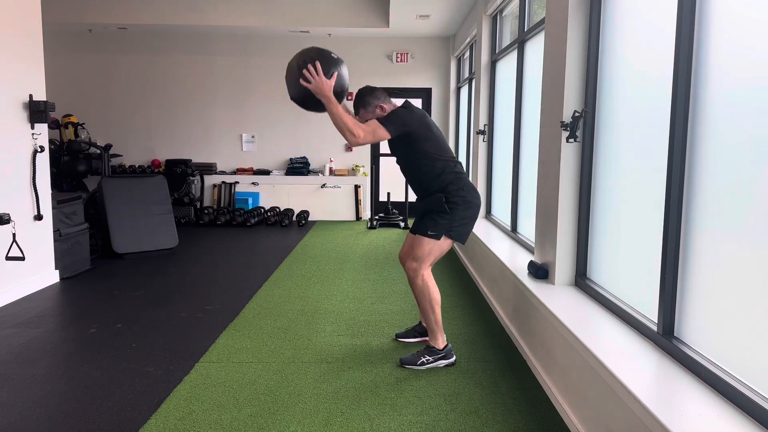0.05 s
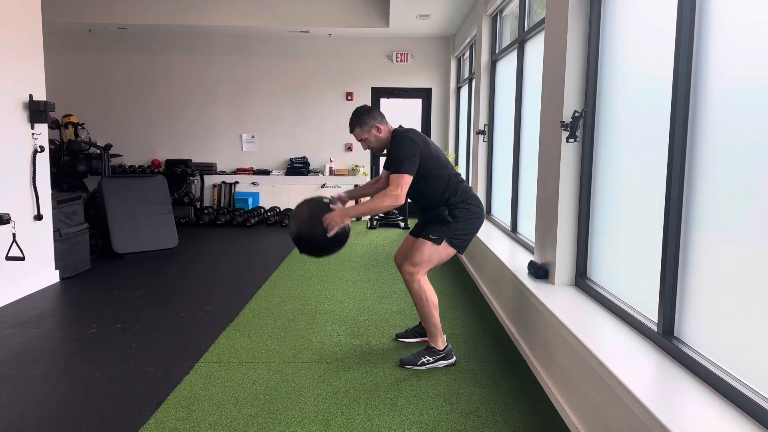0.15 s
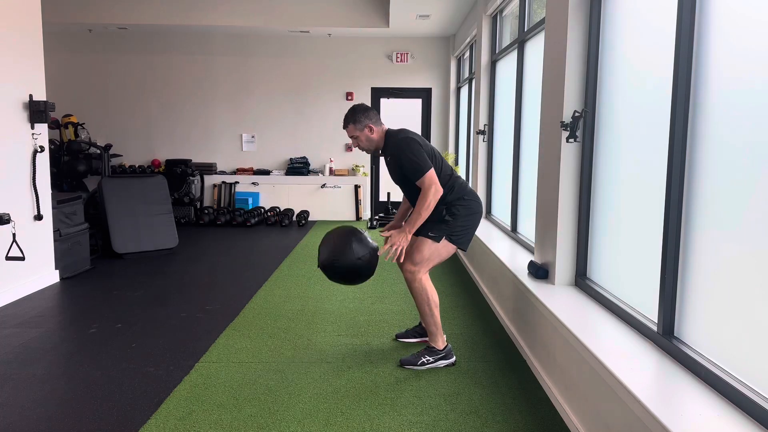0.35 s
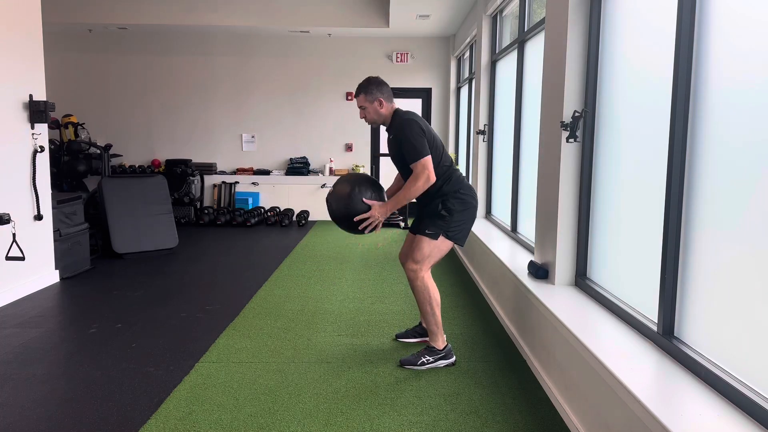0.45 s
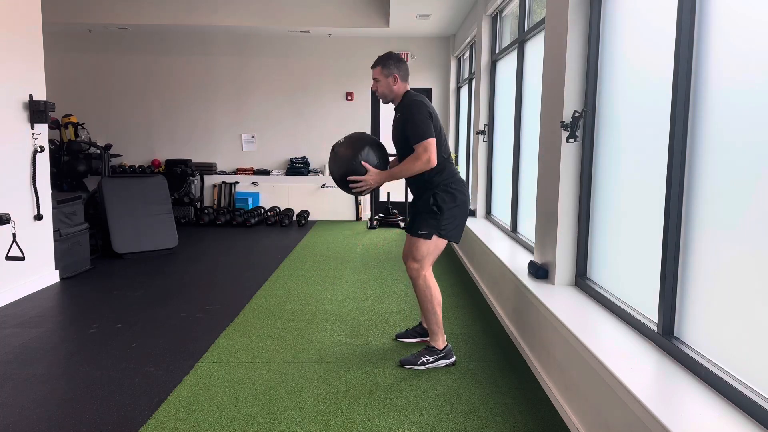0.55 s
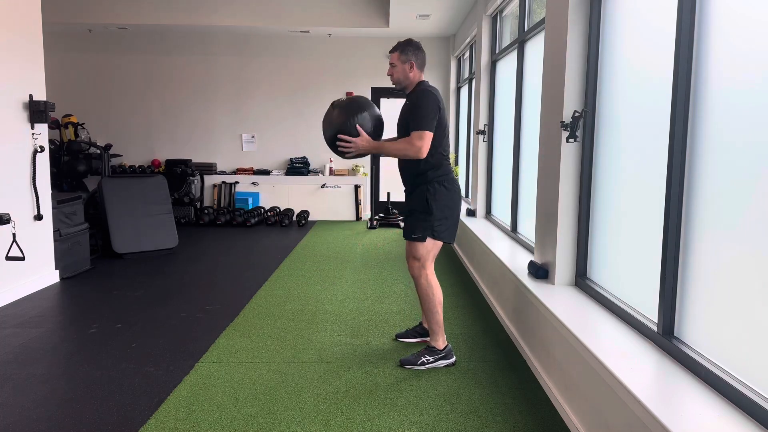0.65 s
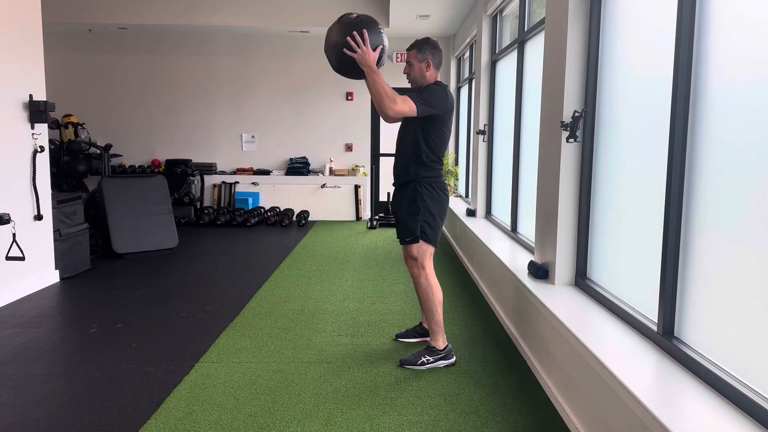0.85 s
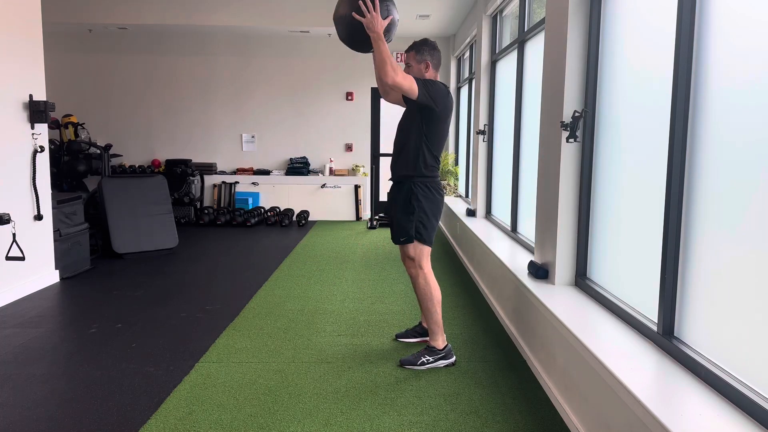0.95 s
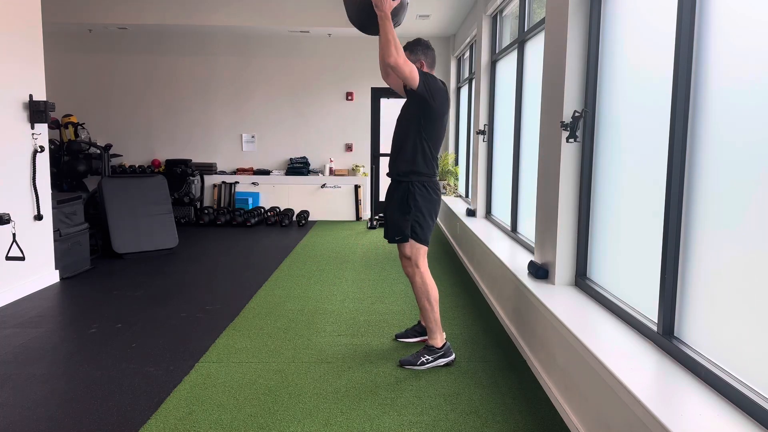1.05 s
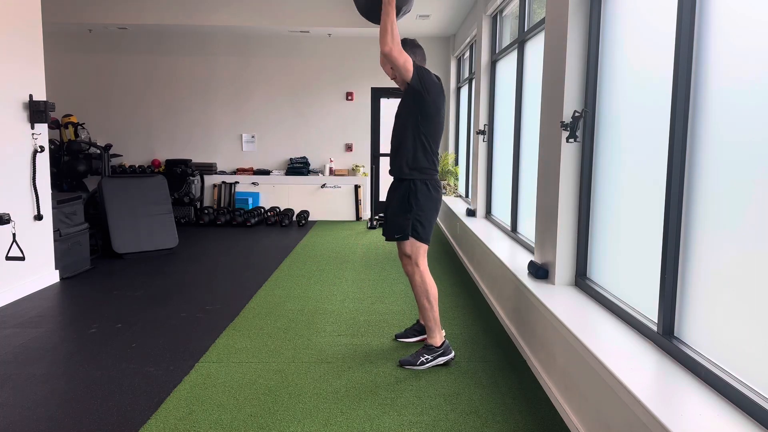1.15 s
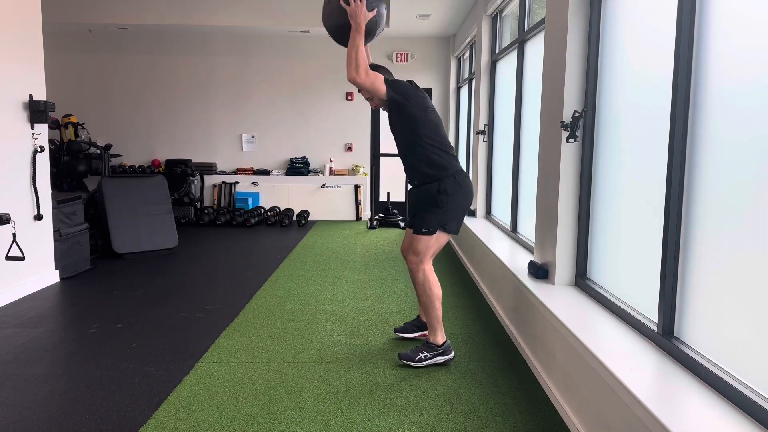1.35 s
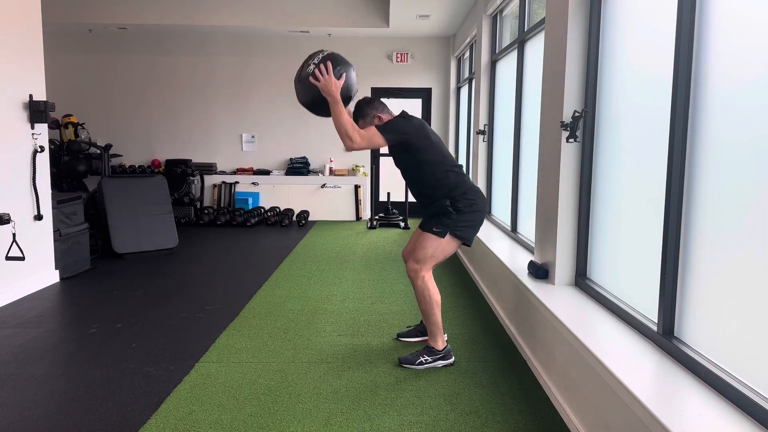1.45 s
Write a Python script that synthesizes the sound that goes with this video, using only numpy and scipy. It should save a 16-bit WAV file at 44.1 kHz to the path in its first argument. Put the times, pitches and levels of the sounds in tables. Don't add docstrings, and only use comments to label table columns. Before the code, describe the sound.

A heavy rubber ball slams onto gym turf with a deep thud and long boomy decay

```python
import sys
import numpy as np
from scipy import signal
from scipy.fft import rfft, irfft, next_fast_len
from scipy.io import wavfile
from scipy.ndimage import uniform_filter1d, map_coordinates

SR = 44100
rng = np.random.default_rng(int(sys.argv[2]) if len(sys.argv) > 2 else 0)


def materialize(psi):
    bounded = np.clip(np.atleast_2d(psi).T, -1, 1)
    quanta = np.round(bounded * 32767).astype(np.int16)
    wavfile.write(sys.argv[1], SR, quanta)


def attenuation_scalar(level_db):
    decades = np.asarray(level_db, float) / 20
    return 10 ** decades


N = 66150


def unit(x):
    return x / np.sqrt(np.mean(x ** 2) + 1e-20)


def along(points, hz):
    point_hz, value = np.transpose(points)
    return np.interp(np.log(hz + 1), np.log(point_hz + 1), value)


def curve(rows):
    return np.interp(np.arange(N) / SR, *np.transpose(rows))


def wobble(rate_hz):
    knots = rng.standard_normal(int(N * rate_hz / SR) + 4)
    return map_coordinates(knots, [np.arange(N) * rate_hz / SR])


def filtered(x, response):
    size = next_fast_len(N + 8192)
    return irfft(rfft(x, size) * response(np.fft.rfftfreq(size, 1 / SR)), size)[..., :N]


SLAM_S = .2432


def since_slam(lead_s=0):
    return np.maximum(np.arange(N) / SR - SLAM_S + lead_s, 0)


# pitch_hz, likeness [-1 to 1]
LIKENESS = [(60, 0.89), (130, 0.94), (290, 0.66), (640, -0.13), (1410, -0.28), (3100, 0.038), (6820, -0.11),
            (15000, 0.41)]
# pitch_hz, left_over_right_db
BALANCE = [(60, -1), (300, -.5), (1300, 2.5), (2500, -0.5), (5000, 7), (9000, 1), (13000, 0)]


def rush(spectrum, likeness, patchy_db, t60=None):
    _, t, z = signal.stft(rng.standard_normal((2, N)), SR, nperseg=512)
    bin_hz = np.fft.rfftfreq(512, 1 / SR)
    patches = uniform_filter1d(rng.standard_normal(z.shape[1:]), size=3, axis=0)
    patches = uniform_filter1d(patches, size=10, axis=1)
    z = z * attenuation_scalar(patchy_db * unit(patches))
    level = np.sqrt(np.mean(attenuation_scalar(2 * along(spectrum, bin_hz))))
    if t60:
        z = z * attenuation_scalar(-60 * np.maximum(t - SLAM_S, 0) / along(t60, bin_hz)[:, None])
    pair = signal.istft(z, SR, nperseg=512)[1][:, :N]

    def mid_side(hz):
        turn = np.arccos(np.clip(along(likeness, hz), -1, 1)) / 2
        return attenuation_scalar(along(spectrum, hz)) * [np.cos(turn), np.sin(turn)]

    def left_right(hz):
        return attenuation_scalar(np.outer([.5, -.5], along(BALANCE + [(16000, 0)], hz)))

    mid, side = filtered(pair, mid_side)
    return filtered(np.array([mid + side, mid - side]), left_right) / level


def ring(hz, db, t60, rise_s, lead_s=0):
    t = since_slam(lead_s)
    return attenuation_scalar(db - 60 * t / t60) * (1 - np.exp(-t / rise_s)) * np.sin(2 * np.pi * hz * t)


# pitch_hz, level_db [dB per Hz]
AIR_COLOUR = [(18, -49), (32, -22.5), (62, 0.5), (130, -10.5), (226, -5), (320, -13.5), (1180, -12.5),
              (10000, -41)]
AIR_DB = -41


def air():
    return attenuation_scalar(AIR_DB) * rush(AIR_COLOUR, LIKENESS, patchy_db=1.36)


# start_s, level_db
EFFORT = [(0, -80.5), (.1, -78), (.188, -66), (.232, -68.5), (.3, -60), (.4, -71), (.46, -88), (.5, -65),
          (.56, -68.5), (.646, -68), (.79, -63.5), (.88, -68.5), (.98, -69.5), (1.01, -72.5), (1.2, -79.5),
          (1.3, -88.5), (1.41, -74.5), (1.5, -79.5)]
# pitch_hz, level_db [dB per Hz]
RUSTLE_COLOUR = [(2000, -20.5), (5000, 7), (8500, -0.5), (12000, 17.5), (15500, -9.5)]
RUSTLE_DB = 17


def rustle():
    effort_db = curve(EFFORT) + RUSTLE_DB
    likeness = [(4000, 0.3), (8000, 0.43), (14000, 0.6)]
    return attenuation_scalar(effort_db + 1.5 * wobble(27)) * rush(RUSTLE_COLOUR, likeness, patchy_db=4.5)


# start_s, level_db
SWISH = [
    (.11, -42),
    (.16, -43.5),
    (.19, -29),
    (.235, -29.5),
    (.26, -42),
]
# pitch_hz, level_db [dB per Hz]
SWISH_COLOUR = [(40, -17), (100, -2), (575, -6.5), (1160, -12), (1600, -25), (8000, -51.5)]


def swish():
    return attenuation_scalar(curve(SWISH) + 1.8 * wobble(55)) * rush(SWISH_COLOUR, LIKENESS, patchy_db=2.5)


# pitch_hz, level_db, t60_s
SHELL = [(467, 3.5, .024), (762, -5.5, 0.026), (1328, -4.5, 0.013), (1980, -13.5, 0.017),
         (2640, -27, 0.017), (4040, -23, 0.0067)]
# delay_s, left_db, right_db
WALLS = [(.0075, -10.5, -4), (0.013, -8.5, -10.5), (.017, -16.5, -13), (0.022, -26, -22),
         (0.037, -13, -19.5), (.047, -12.5, -20)]
SLAM_DB = 1.5
CRACK_DB, CRACK_T60_S = -35, 0.05


def slap():
    t = since_slam()
    knock = sum(ring(hz, db, t60, rise_s=1.2 / hz) for hz, db, t60 in SHELL)
    grit = rng.standard_normal(N) + 0.62 * rng.standard_normal((2, N))
    crack = (t > 0) * attenuation_scalar(CRACK_DB - 60 * t / CRACK_T60_S) * grit
    taps = np.zeros((2, N))
    taps[:, 0] = 1
    for delay_s, left_db, right_db in WALLS:
        at = (SR * (delay_s + rng.uniform(0, .001, 2))).astype(int)
        taps[:, at] = np.diag(attenuation_scalar([left_db, right_db]) * rng.choice([-1, 1]))
    return attenuation_scalar(SLAM_DB) * (signal.fftconvolve(knock[None], taps, axes=1)[:, :N] + crack)


STEEPEN_AFTER_S, STEEPEN_DB_PER_S = 0.68, 21


def late_loss_db():
    return -STEEPEN_DB_PER_S * np.maximum(since_slam() - STEEPEN_AFTER_S, 0)


# pitch_hz, level_db, t60_s, polarity
ROOM_MODES = [(36, -27, .8, 1), (48.7, -6.5, .82, -1), (51.2, -7.5, .78, 1), (63, -11.5, 2.04, 1),
              (71.8, -19.5, 2.3, -1), (75.3, -25, 2.6, 1), (79, -15.5, 1.14, -1), (84.7, -20, 2, -1),
              (106.4, -14, .84, -1), (118.5, -13.5, .9, -1), (167, -20, 1.3, -1), (200.8, -18, .8, -1),
              (277, -14, .45, 1)]
# pitch_hz, level_db, t60_s, polarity
SLAB = [(66.2, -1.5, .25, -1), (95.3, -8, .45, -1), (84.7, -5, .17, -1), (98.8, 2.5, .09, 1),
        (54.5, -25, 2.5, 1), (155, -15, .3, -1), (250, -14, .12, -1)]
BOOM_RISE_S, BOOM_LEAD_S = .008, .001
BOOM_LEFT_DB, SIDEWAYS_DB = -.6, -20
BOOM_STEEPEN = 3


def boom():
    modes = np.array([sign * ring(hz, db, t60, BOOM_RISE_S, BOOM_LEAD_S)
                      for hz, db, t60, sign in ROOM_MODES + SLAB])
    side = attenuation_scalar(SIDEWAYS_DB) * rng.choice([-1, 1], len(modes)) @ modes
    pair = modes.sum(0) * attenuation_scalar([[BOOM_LEFT_DB], [-BOOM_LEFT_DB]]) + [side, -side]
    return attenuation_scalar(BOOM_STEEPEN * late_loss_db()) * pair


# pitch_hz, level_db, t60_s
PANELS = [(355, -24, .9), (401, -24, .9), (474, -26, .5), (590, -24, .5), (654, -27, 1.3), (849, -29, 1.1),
          (1073, -33, .8), (1227, -34, .6), (1280, -35, .6), (1505, -38, .6), (2008, -40, .5)]


def panels():
    rings = np.array([-ring(hz, db, t60, rise_s=0.025) * attenuation_scalar(2.4 * wobble(18)) for hz, db, t60 in PANELS])
    turn = rng.uniform(-np.pi / 2, np.pi / 2, len(rings))
    return np.array([np.cos(turn - np.pi / 4), np.cos(turn + np.pi / 4)]) @ rings


# pitch_hz, level_db [dB per Hz]
TAIL_COLOUR = [(28, -13), (70, -3), (140, -5.5), (250, -4), (550, -5), (1100, -10), (2300, -25),
               (4000, -45)]
# pitch_hz, t60_s
TAIL_T60 = [(100, 1.85), (500, 1.73), (1000, 1.78), (2000, 1.06), (4000, 2.82)]
TAIL_DB, TAIL_FILL_S = -11, 0.0083
# pitch_hz, level_db [dB per Hz]
SCATTER_COLOUR = [(800, -17.5), (1500, -3), (2300, -2.5), (3500, -11), (6500, -22), (9000, -22.5),
                  (15500, -23)]
# pitch_hz, t60_s
SCATTER_T60 = [(2000, 0.4), (6000, 0.93), (10000, 0.17), (15000, .25)]
SCATTER_DB, SCATTER_FILL_S = -30, 0.034


def tail():
    def fill(rise_s):
        return 1 - np.exp(-since_slam() / rise_s)

    colour = TAIL_COLOUR + [(17000, -90)]
    body = rush(colour, LIKENESS, patchy_db=1.18, t60=TAIL_T60)
    body = attenuation_scalar(TAIL_DB + late_loss_db()) * fill(TAIL_FILL_S) * body
    scatter = rush(SCATTER_COLOUR, [(3000, .1), (14000, .9)], patchy_db=1.8, t60=SCATTER_T60)
    return body + attenuation_scalar(SCATTER_DB) * fill(SCATTER_FILL_S) * scatter


def scene():
    return air() + rustle() + swish() + slap() + boom() + panels() + tail()


def top_cut(x):
    return signal.sosfilt(signal.butter(12, 17000, fs=SR, output="sos"), x)


# pitch_hz, level_db
PORT = [(30, 0), (7000, -1.5), (8800, 3), (10000, -9.5), (10600, -80), (12300, -80), (12700, -15.5),
        (15500, 0)]
CEILING, KNEE = 1.1, 3
TOP_HZ = 15900


def record(dry):
    x = dry / (1 + np.abs(dry / CEILING) ** KNEE) ** (1 / KNEE)
    mix = filtered(x, lambda hz: attenuation_scalar(along(PORT, hz)) * (hz < TOP_HZ))
    return top_cut(mix)


dry = scene()
out = record(dry)
materialize(out)
```